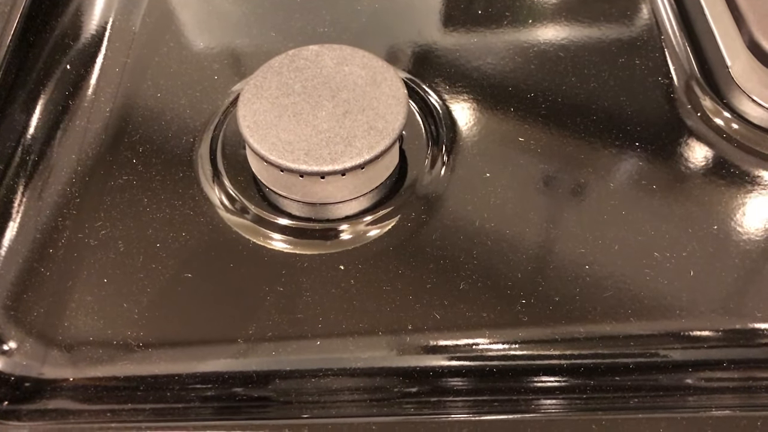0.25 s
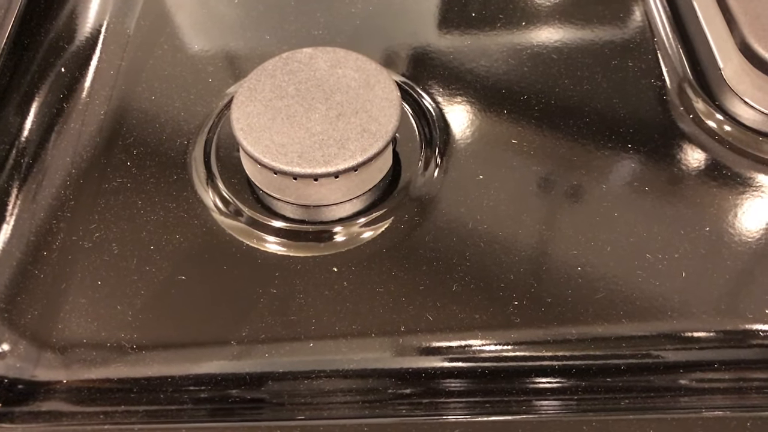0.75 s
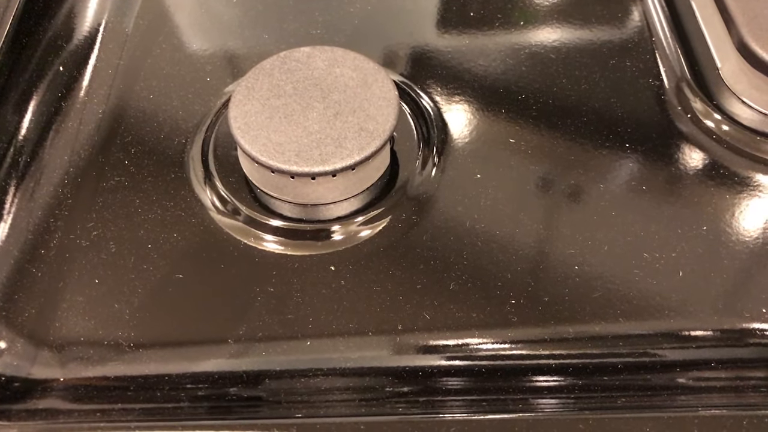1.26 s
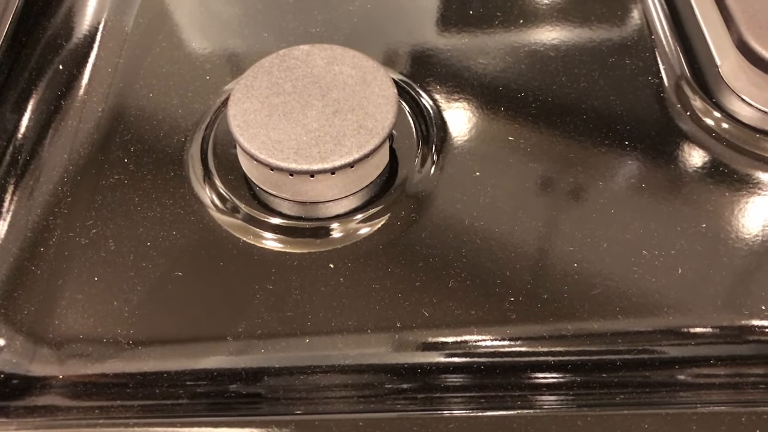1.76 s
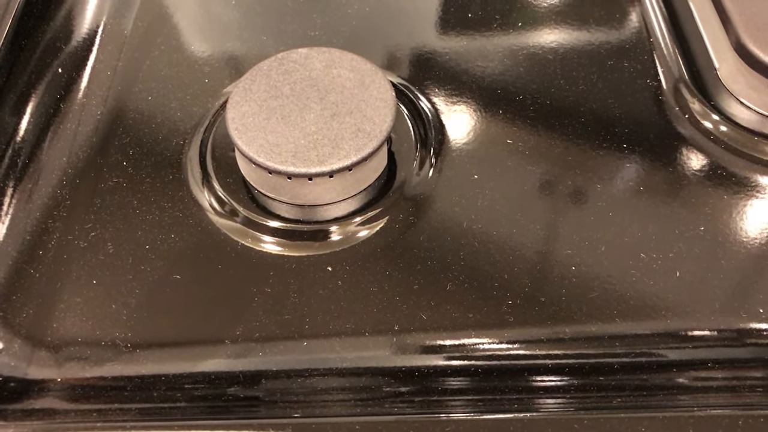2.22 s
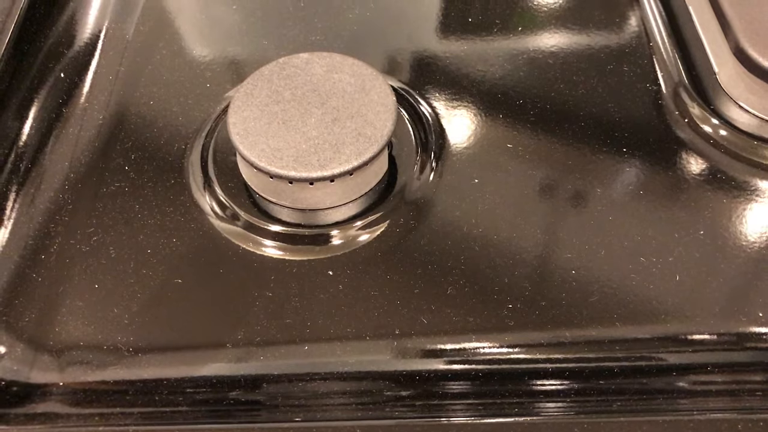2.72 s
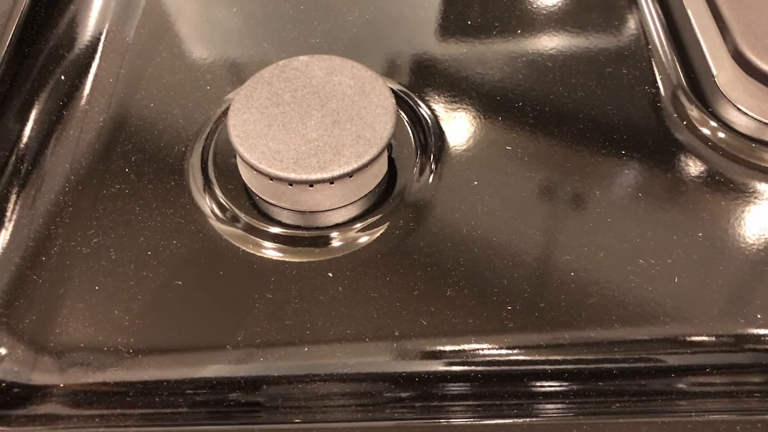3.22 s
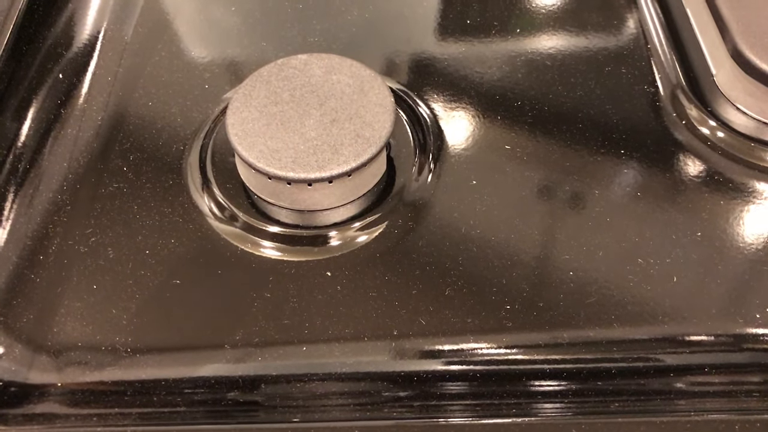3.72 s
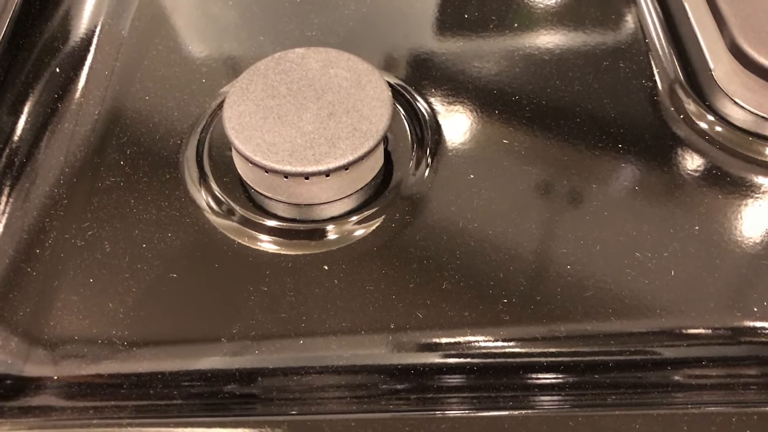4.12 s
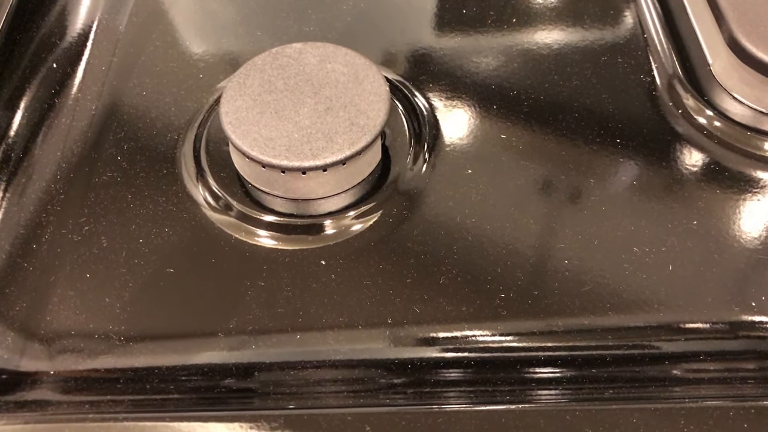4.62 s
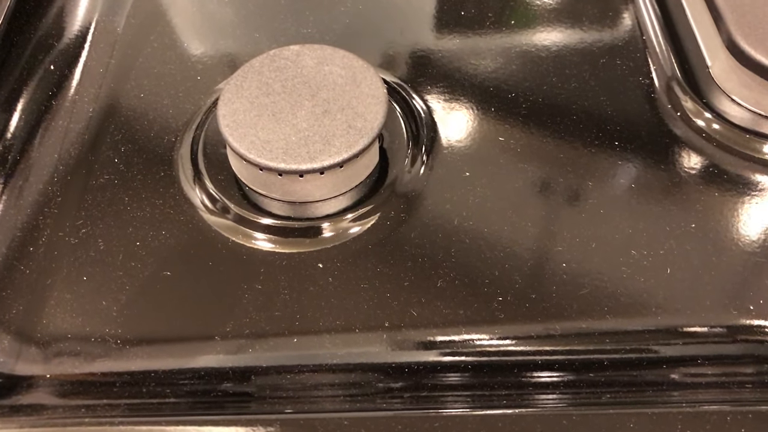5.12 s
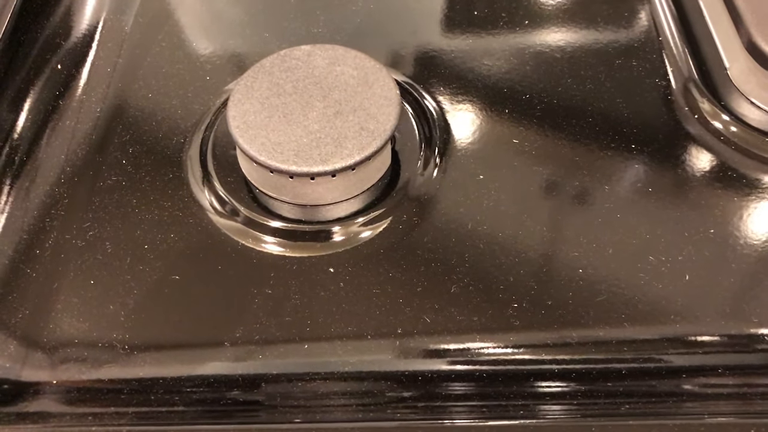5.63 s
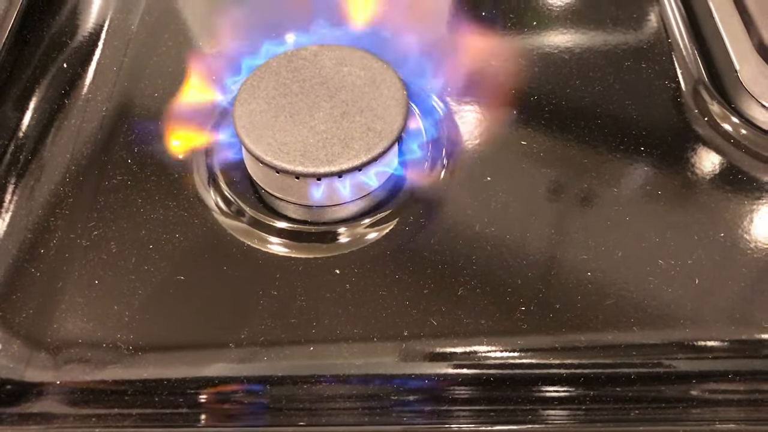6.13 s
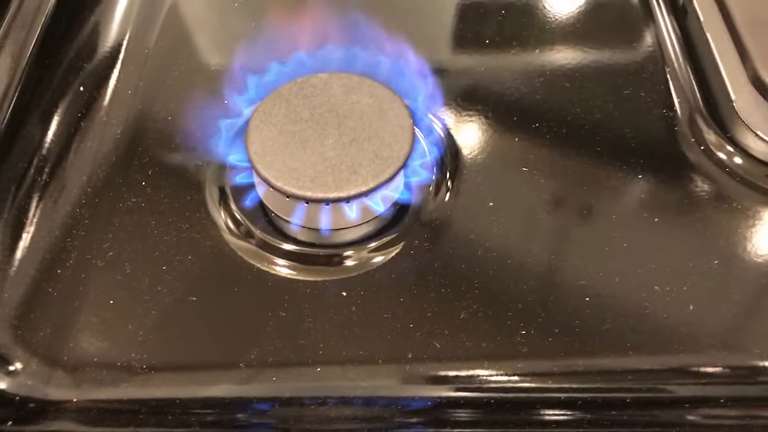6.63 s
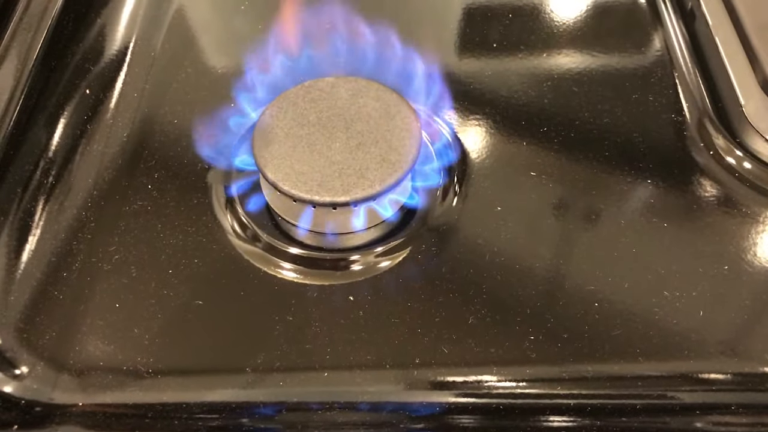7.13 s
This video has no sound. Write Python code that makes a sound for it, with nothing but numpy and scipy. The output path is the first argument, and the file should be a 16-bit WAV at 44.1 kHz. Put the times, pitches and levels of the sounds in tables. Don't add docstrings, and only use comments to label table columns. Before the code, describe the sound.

A kitchen gas burner heard closely in mono, over faint room air, low rumble, a distant motor hum and slight microphone hiss. At 0.5 s a spark igniter snaps, sharp and bright, then continues at about six snaps per second until 2.7 s. Each is a hard, dry electric tick with fine metallic ringing and a short, splashy room tail. About a second without sparks follows, with only a very thin gas purge. At 3.7 s the same regular ticking returns, and a breathy, high hiss of gas swells strongly through 4.5 s towards 6 s. At about 6.1 s the burner catches: a soft, deep push of air and quick burst of flame, settling at once into a low, fluttering roar with small irregular pops. The snaps carry on, slightly more uneven, above the hiss and flame until the end at about 7.4 s.

```python
import sys
import numpy as np
from scipy import signal
from scipy.fft import rfft, irfft, next_fast_len
from scipy.io import wavfile
from scipy.ndimage import uniform_filter1d

SR = 44100
rng = np.random.default_rng(int(sys.argv[2]) if len(sys.argv) > 2 else 0)


def master_out(mix):
    frames = np.transpose(np.atleast_2d(mix))
    ceiling = np.clip(frames, -1, 1)
    pcm = np.round(ceiling * 32767).astype(np.int16)
    wavfile.write(sys.argv[1], SR, pcm)


def ratio_of_db(decibels):
    return 10 ** (np.asarray(decibels, float) / 20)


N = 324612

LIT_S = 6.1
# t/s, level/dB
GAS_FLOW = [
    (0, -65),
    (2.5, -40),
    (3.2, -45.5),
    (3.8, -19),
    (4.5, -8),
    (6.1, 0),
    (6.4, -1),
    (7.25, -1.5),
    (7.36, 7),
]


def evened(x):
    return x / np.sqrt(np.mean(x ** 2) + 1e-20)


def read(points, hz, column=1):
    columns = np.transpose(points)
    return np.interp(np.log(hz + 1), np.log(columns[0] + 1), columns[column])


def follow(rows):
    s, level_db = np.transpose(rows)
    return np.interp(np.arange(N) / SR, s, level_db)


def add(mix, s, sound):
    part = mix[round(s * SR):][:len(sound)]
    part += sound[:len(part)]


def noise(points):
    size = next_fast_len(N)
    white = rfft(rng.standard_normal(size))
    coloured = white * ratio_of_db(read(points, np.fft.rfftfreq(size, 1 / SR)))
    return evened(irfft(coloured, size)[:N])


def flutter(hz):
    b, a = signal.butter(2, min(hz, 999), fs=SR)
    return evened(signal.lfilter(b, a, rng.standard_normal(N)))


def wavering(hz, width_hz):
    r = np.exp(-np.pi * width_hz / SR)
    stir = rng.standard_normal(N) + 1j * rng.standard_normal(N)
    slow = signal.lfilter([1], [1, -2 * r, r * r], stir)
    return evened((slow * np.exp(2j * np.pi * hz * np.arange(N) / SR)).real)


def igniter():
    # delay/ms, level/dB, centre f/Hz, spread/ms
    echo_paths = [(-0.34, -29.4, 6000, 0.2), (-0.14, -31.3, 2600, 0.4), (0.09, -11.9, 11200, 0.1),
                  (0.14, -29, 15300, 0.14), (0.25, -46.1, 600, 0.8), (0.39, -29.1, 4000, 0.2),
                  (0.43, -23.8, 10600, 0.1), (0.45, -19.9, 6200, 0.2), (0.77, -23.8, 14000, 0.2),
                  (0.95, -42.2, 2200, 0.8), (1.02, -14.1, 7800, 0.1), (1.38, -22.0, 12200, 0.2),
                  (1.68, -17.4, 8400, 0.1), (2.24, -26.4, 10400, 0.1), (2.59, -26.2, 6400, 0.4),
                  (3.02, -23.3, 9000, 0.4), (4.6, -26.8, 4000, 0.1), (4.85, -21.7, 9800, 0.4),
                  (4.99, -28.6, 6200, 0.2), (5.49, -24.8, 10600, 0.1), (6.46, -28.4, 11200, 0.2),
                  (6.76, -35.6, 6400, 0.8), (6.83, -29.1, 7600, 0.4), (7.8, -30.4, 10000, 0.4),
                  (11.18, -24.4, 7400, 0.1), (13.67, -33.7, 8600, 0.8), (15.9, -35.3, 6200, 0.8),
                  (16.53, -31.8, 4600, 0.4), (17.44, -28.3, 9800, 0.4), (21.5, -34.3, 5200, 0.4)]
    # f/Hz, cold air/dB, through the flame/dB
    path_colour = [(1500, 0, -1), (2700, 0.5, -3), (3200, -1.5, 0), (4070, 3, -3.5), (4600, -0.5, 1.5),
                   (4970, -5.5, -5), (5370, 2, 1), (5900, -2, 1), (6400, 1, 0), (7100, 0, 1),
                   (9000, -0.5, -1), (12000, 0.5, 0), (16000, 1, 2)]
    # f/Hz, level/dB, t60/s
    metal_rings = [(600, -60, 0.0097), (772, -42, 0.024), (995, -39, 0.0068), (1280, -45, 0.014),
                   (2060, -40.5, 0.013), (2526, -36.5, 0.015), (2857, -34.5, .012), (4405, -52.5, 0.37),
                   (4620, -53.5, 0.33), (4720, -59, 0.29), (5345, -62.5, 0.18), (6390, -52.5, 0.39),
                   (8740, -54, .15), (9730, -53, 0.12)]
    spark_db, tail_db = -28, -4
    lean_knock_db, rich_knock_db, lit_knock_db = -8, 11, -9
    rich_stir, lit_stir = 0.4, 0.3
    early_s = 0.0005

    out, size = np.zeros(N), SR // 2
    t = np.arange(9000) / SR
    delay_ms, path_level_db, path_hz, spread_ms = np.transpose(echo_paths)[:, :, None]
    settled = kitchen_tail(size)
    rich = np.minimum(ratio_of_db(follow(GAS_FLOW)), 1)
    for s, strength_db in sparks():
        in_flame = s > LIT_S
        gas_share = rich[round(s * SR)]
        loose = np.clip(lit_stir if in_flame else rich_stir * gas_share, 0, 1)
        knock_db = lit_knock_db if in_flame else lean_knock_db + rich_knock_db * gas_share

        shift, sway = rng.standard_normal((2, len(echo_paths), 1))
        age_ms = (t[:1100] - early_s) * 1000 - delay_ms - 0.06 * loose * shift
        path_db = path_level_db + 5 * loose * np.clip(sway, -2, 1) + knock_db * (path_hz < 1500)
        packet = np.exp(-0.5 * (age_ms / spread_ms) ** 2) * np.cos(2 * np.pi * path_hz * age_ms / 1000)
        paths = (ratio_of_db(path_db) * packet).sum(0)
        colour_db = read(path_colour, np.fft.rfftfreq(2048, 1 / SR), column=1 + in_flame)

        tail = np.sqrt(1 - loose) * settled + np.sqrt(loose) * kitchen_tail(size)
        snap = ratio_of_db(spark_db + tail_db) * tail
        add(snap, 0, irfft(rfft(paths, 2048) * ratio_of_db(colour_db))[:1200])
        for ring_hz, ring_db, t60 in metal_rings:
            decay_db = ring_db + knock_db * (ring_hz < 1500) - 60 * t / t60
            add(snap, 0, ratio_of_db(decay_db) * np.sin(2 * np.pi * ring_hz * t))
        add(out, s - early_s, ratio_of_db(strength_db) * snap)
    return signal.sosfilt(signal.butter(4, 480, "high", fs=SR, output="sos"), out)


def sparks():
    # first spark t/s, sparks in the group
    spark_groups = [
        (0.5338, 1),
        (0.7138, 5),
        (1.5649, 5),
        (2.4004, 3),
        (3.6845, 5),
        (4.5351, 5),
        (5.3861, 5),
        (6.2371, 5),
        (7.0881, 1),
    ]
    period_s, recharge_s = 0.16745, 0.0012
    first_db, cold_scatter_db, lit_scatter_db = 0.3, 0.32, 0.54
    times, extra_db = [], []
    for start_s, count in spark_groups:
        for k in range(count):
            times.append(start_s + k * period_s + recharge_s * (k > 0))
            extra_db.append(first_db * (k == 0))
    s = np.array(times)
    scatter_db = np.where(s > LIT_S, lit_scatter_db, cold_scatter_db)
    return zip(s, extra_db + scatter_db * rng.standard_normal(len(s)))


def kitchen_tail(size):
    # f/Hz, level/dB per Hz
    tail_colour = [(240, -44.5), (400, -22), (800, -19.5), (1500, -25), (2200, -18), (3000, -11.5),
                   (3800, -12.5), (4500, -9), (6300, -5), (10500, -1.5), (15700, -7.5), (16000, -23.5),
                   (17200, -30)]
    # f/Hz, early t60/s, late t60/s, late part level/dB
    room_decay = [(500, .08, .3, -13), (1510, 0.18, 0.37, 1), (2475, 0.11, 0.55, -5),
                  (4000, 0.19, 0.51, -7), (6080, 0.25, 0.67, -5), (9050, 0.28, 0.47, -5),
                  (12000, 0.19, 0.37, -7), (16000, 0.24, .26, -11)]
    hz, t, z = signal.stft(rng.standard_normal(size), SR, nperseg=256)
    early, late, late_db = (read(room_decay, hz, column=k)[:, None] for k in range(1, 4))
    dying = np.hypot(ratio_of_db(-60 * t / early), ratio_of_db(late_db - 60 * t / late))
    z = z * ratio_of_db(read(tail_colour, hz)[:, None]) * dying
    tail = signal.istft(z, SR, nperseg=256)[1][:size]
    tail = tail / np.sqrt(np.mean(tail[:1000] ** 2))
    return tail * np.interp(np.arange(size), [0, 50, 450], [0, 0.55, 1])


def flame():
    # f/Hz, level/dB per Hz
    roar_colour = [(150, -22), (250, -14), (318, -19), (352, -49), (416, -0.5), (471, -18), (518, 3),
                   (574, -18), (664, -2), (908, -12.5), (1280, -12), (1710, -23.5), (3000, -24),
                   (3900, -40), (6600, -120)]
    # f/Hz, level/dB per Hz
    deep_colour = [(18, -24), (30, -5), (49, -22), (130, -6.5), (237, -14), (281, -9), (330, -23),
                   (430, -56), (730, -120)]
    # t/s, level/dB
    flame_size = [
        (6.08, -58),
        (6.095, -50),
        (6.14, -45),
        (6.165, -49),
        (6.195, -42.5),
        (6.235, -53),
        (6.32, -57),
        (6.45, -49),
        (7.36, -51),
    ]
    # t/s, peak level/dB, f/Hz
    large_pops = [(6.097, -40, 690), (6.124, -36, 690), (6.14, -32, 690), (6.19, -36, 510),
                  (6.213, -36, 800), (6.341, -42, 440), (6.617, -34, 700), (6.667, -34, 690),
                  (6.709, -36, 700), (6.891, -35, 700), (7.121, -37, 700), (7.239, -35, 510)]
    # start t/s, f/Hz
    catching = (6.075, 5.9)
    catch_s, swing_hz = catching
    deep_db, flash_db, flash_s = -4, 9, 0.1
    swing_db, swing_rise_s, swing_fade_db_per_s = -29.5, 0.064, 15

    since = np.arange(N) / SR - catch_s
    burning_s = np.maximum(since, 0)
    lit = np.clip(since / 0.019, 0, 1)
    roar = noise(roar_colour) * ratio_of_db(2.4 * flutter(60) + 2.2 * flutter(15))
    deep = ratio_of_db(deep_db + flash_db * np.exp(-burning_s / flash_s)) * noise(deep_colour)

    sizes = ratio_of_db(3 * np.minimum(rng.exponential(1, N), 3)) * (rng.random(N) < 400 / SR)
    kind = rng.integers(0, 3, N)
    scatter = np.zeros(N)
    for k, hz in enumerate([480, 700, 1150]):
        scatter += signal.oaconvolve(sizes * (kind == k), pop(hz))[:N]

    out = ratio_of_db(follow(flame_size)) * (ratio_of_db(-2.5) * evened(roar) + ratio_of_db(-6.5) * evened(scatter) + deep)
    for s, peak_db, hz in large_pops:
        add(out, s, ratio_of_db(peak_db) * pop(hz))
    swing = -np.sin(2 * np.pi * swing_hz * since) * ratio_of_db(swing_db - swing_fade_db_per_s * burning_s)
    swing = swing * np.clip(since / swing_rise_s, 0, 1)
    return lit * (out + swing)


def pop(hz):
    t = np.arange(400) / SR
    return np.sin(2 * np.pi * hz * t) * np.exp(-t * hz * 1.9) * 1.1


def gas():
    # f/Hz, level/dB per Hz
    purge_colour = [(1060, -34), (1800, -2.5), (1950, -15), (2200, -11.5), (2390, -8.5), (2920, 1.5),
                    (4060, -15), (4920, -12), (7360, -21), (7560, -20), (8360, -20), (9160, -14),
                    (11100, -21.5), (14900, -28), (16000, -29.5)]
    # f/Hz, level/dB per Hz
    jet_colour = [(880, -41), (1500, -7.5), (1940, -9), (2250, -9.5), (2460, -16.5), (3180, -5.5),
                  (4920, -18.5), (6560, -9.5), (8830, -14.5), (9950, 1.5), (11800, -17.5), (14100, -13),
                  (14900, -23), (15400, -53), (16000, -68)]
    # f/Hz, width/Hz, level/dB
    valve_whistle = (2826, 30, -91)
    purge_db, purge_full_db, jet_db = -75.5, -38, -62.5
    flow_db = follow(GAS_FLOW)
    purge = ratio_of_db(np.minimum(flow_db - purge_full_db, 0))
    hiss = noise(purge_colour) * ratio_of_db(purge_db) * purge + noise(jet_colour) * ratio_of_db(jet_db + flow_db)
    whistle_hz, width_hz, whistle_db = valve_whistle
    whistle = ratio_of_db(whistle_db) * np.sqrt(purge) * wavering(whistle_hz, width_hz)
    return hiss * ratio_of_db(flutter(8)) + whistle


def hum():
    # f/Hz, level/dB
    motor_tones = [(107.7, -78), (215.3, -77.5), (321, -79), (376.8, -81.5)]
    return sum(ratio_of_db(tone_db) * wavering(hz, 1.5) for hz, tone_db in motor_tones)


def quiet():
    # f/Hz, level/dB per Hz
    air_colour = [(35, -43), (60, -10.5), (213, -4), (292, -8), (324, -6), (445, -12), (480, -7.5),
                  (526, -11.5), (649, -6), (755, -9.5), (946, -12.5), (1200, -13.5), (1360, -19),
                  (2200, -47), (2860, -73.5), (4840, -120)]
    # f/Hz, level/dB per Hz
    rumble_colour = [(0.88, -33), (1.5, 4.5), (17, 2), (29, -13.5), (70, -26), (91, -60.5), (150, -120)]
    # f/Hz, level/dB per Hz
    hiss_colour = [(880, -33), (1500, -5.5), (2390, -12.5), (2910, -9), (3300, -13), (4000, -15.5),
                   (6560, -17.5), (9190, -16.5), (15100, -20), (16000, -19.5)]
    air = ratio_of_db(-62.5 + flutter(2.6)) * noise(air_colour)
    return air + ratio_of_db(-75) * noise(hiss_colour) + ratio_of_db(-48.5) * noise(rumble_colour)


def scene():
    return (igniter() + flame() + gas() + hum() + quiet())[None]


def top_cut(x):
    return signal.sosfilt(signal.butter(12, 17120, fs=SR, output="sos"), x)


def record(dry):
    edge_hz, top_hz, above_edge_db, attack_db = 15780, 16500, -6, -55
    inside = signal.oaconvolve(dry, signal.firwin(701, edge_hz, fs=SR)[None], "same")
    above = signal.oaconvolve(dry - inside, signal.firwin(101, top_hz, fs=SR)[None], "same")
    opened = np.clip(uniform_filter1d(above ** 2, size=256) / ratio_of_db(2 * attack_db) - 1, 0, 1)
    mix = inside + ratio_of_db(above_edge_db) * uniform_filter1d(opened, size=128) * above
    return top_cut(mix)


dry = scene()
out = record(dry)
master_out(out)
```